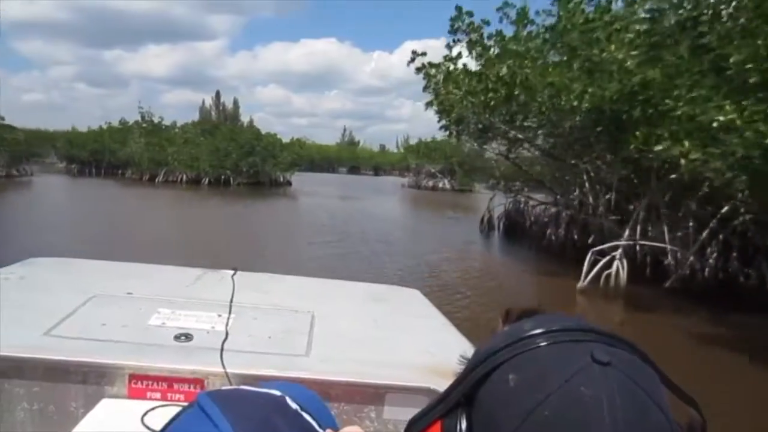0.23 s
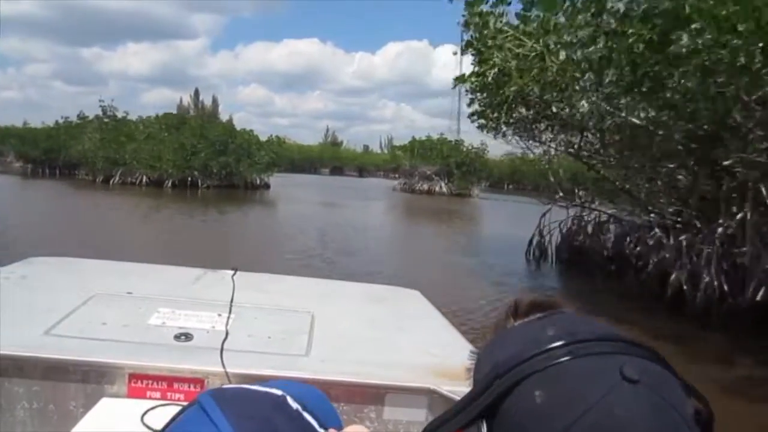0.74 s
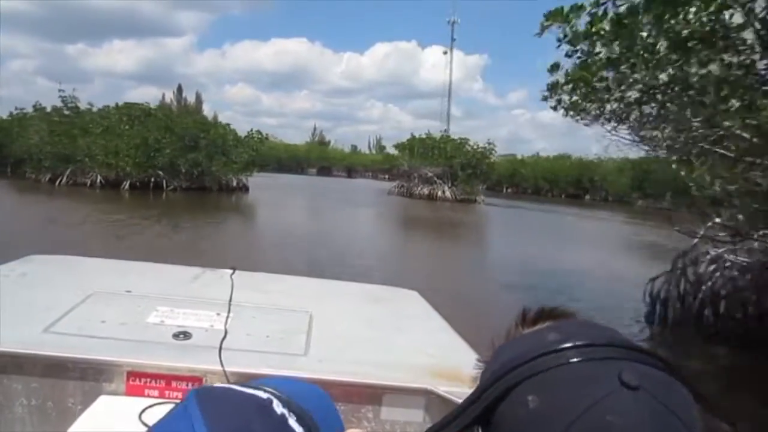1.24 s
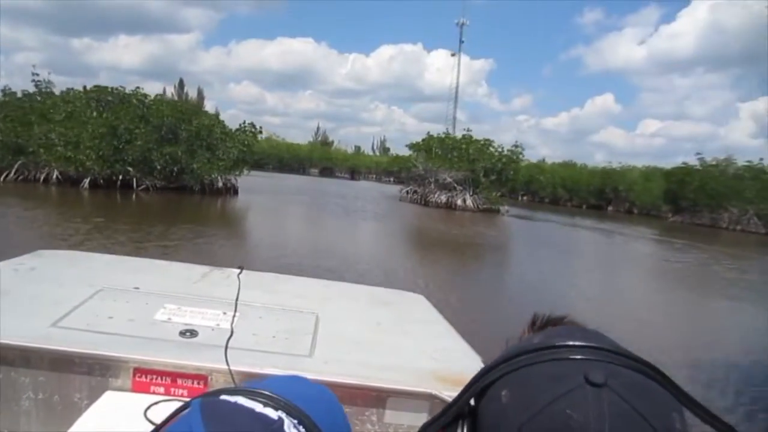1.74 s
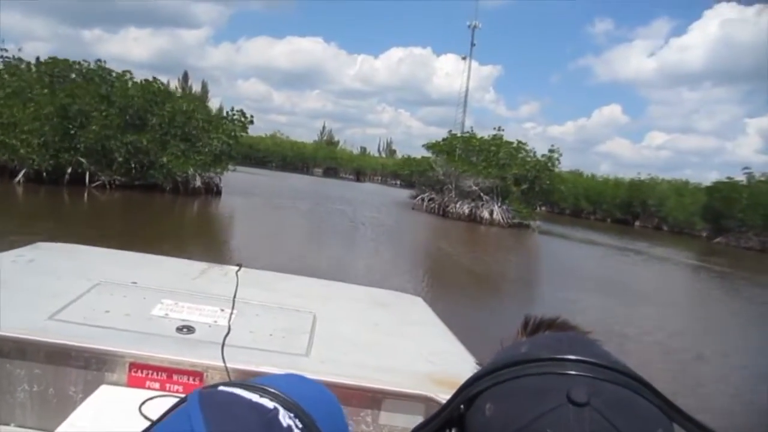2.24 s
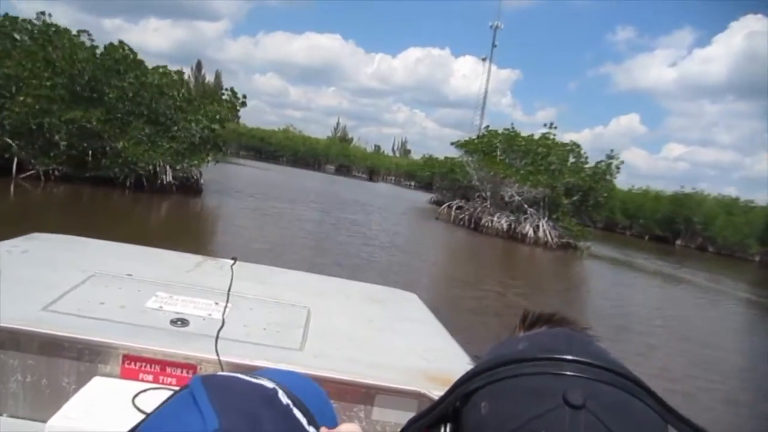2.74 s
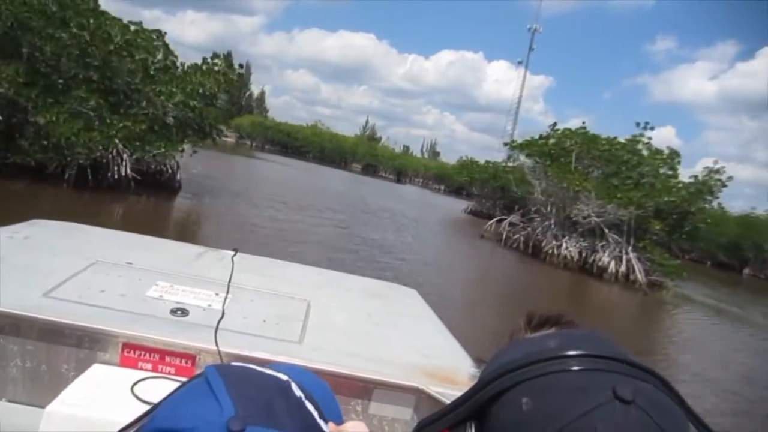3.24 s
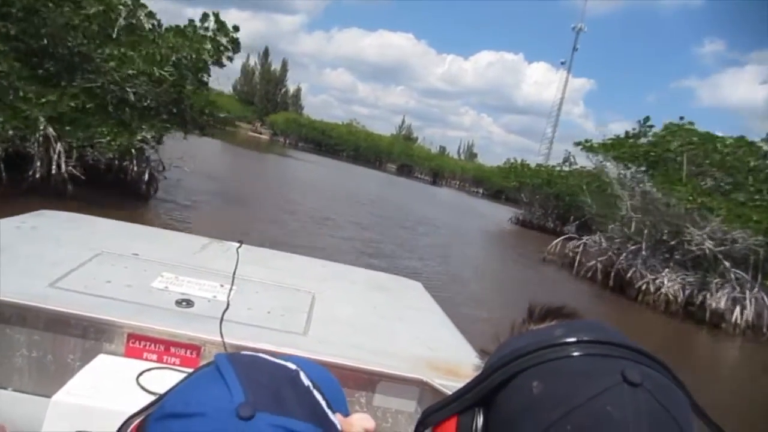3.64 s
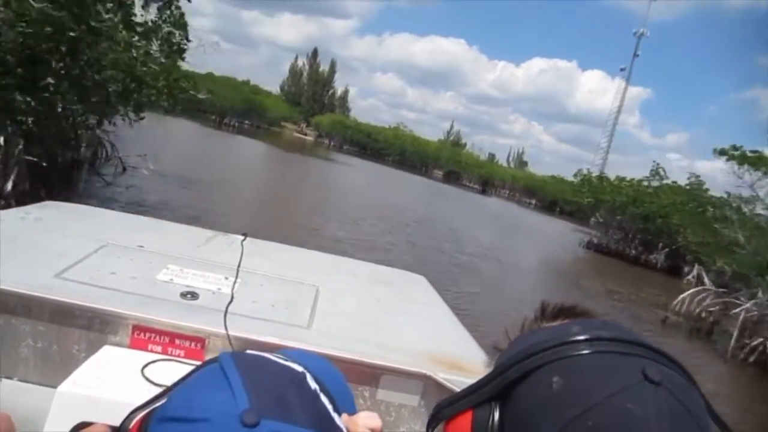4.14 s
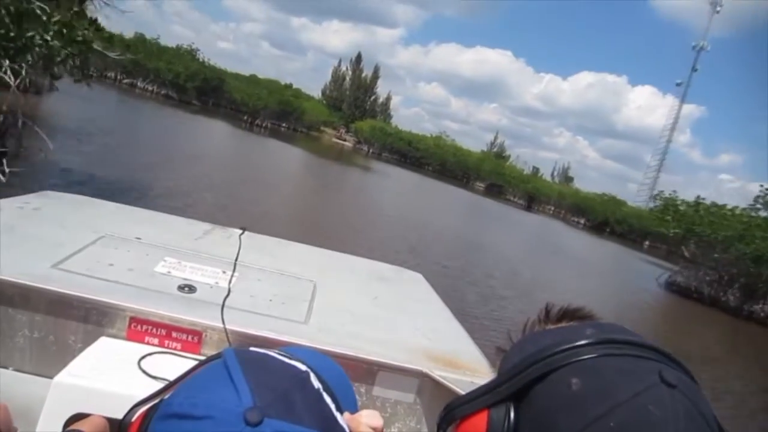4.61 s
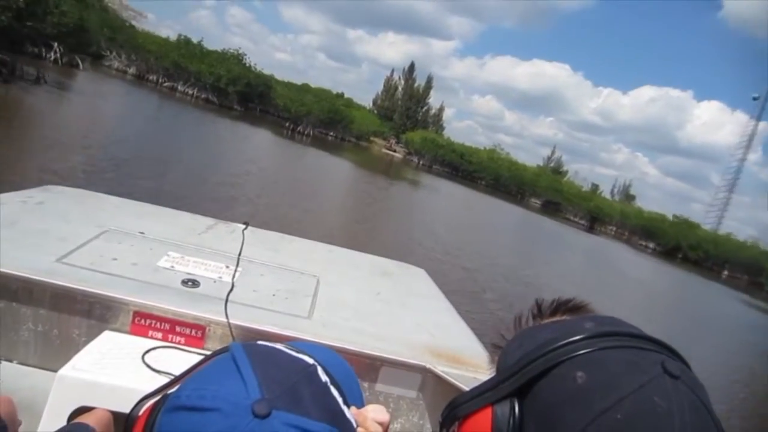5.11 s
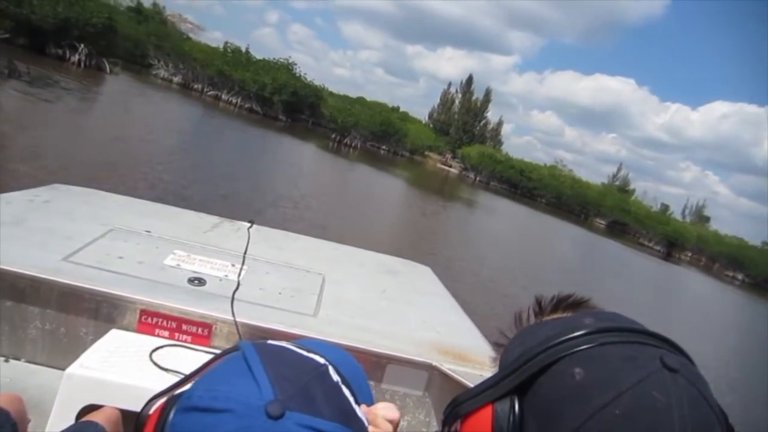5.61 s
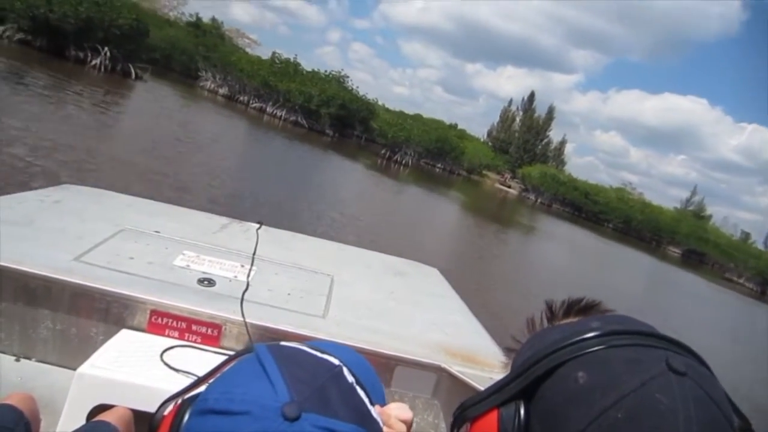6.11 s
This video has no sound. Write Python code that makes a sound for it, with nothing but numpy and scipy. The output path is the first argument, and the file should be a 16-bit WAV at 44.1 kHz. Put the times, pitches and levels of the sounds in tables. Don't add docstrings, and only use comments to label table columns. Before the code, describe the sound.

A loud airboat engine and propeller drone steadily, gradually rising in pitch and force, with roaring churned air and early low wind buffeting.

```python
import sys
import numpy as np
from scipy import signal
from scipy.fft import rfft, irfft, next_fast_len
from scipy.io import wavfile
from scipy.ndimage import uniform_filter1d

SR = 44100
rng = np.random.default_rng(int(sys.argv[2]) if len(sys.argv) > 2 else 0)


def level_to_linear(level):
    exponent = np.asarray(level, float) / 20
    return 10 ** exponent


def persist_wave(psi):
    counts = np.round(np.clip(psi, -1, 1) * 32767).astype(np.int16)
    wavfile.write(sys.argv[1], SR, np.atleast_2d(counts).T)


N = 280476
TIME = np.arange(N) / SR
COARSE = 8
GEAR = 2.617
CRUISE_HZ = 30

# time_s, cycle_hz
SPEED = [(0, 28.28), (.4, 28.32), (1.0, 28.4), (1.2, 28.68), (1.55, 29.18), (1.85, 29.32), (2.2, 29.7),
         (2.5, 29.28), (2.8, 29.04), (3.2, 29.19), (3.45, 29.2), (3.8, 29.8), (4.2, 30.47), (4.8, 31.42),
         (5.25, 31.84), (5.6, 32.24), (6.0, 32.57), (6.36, 32.9)]
# time_s, load_db
LOAD = [(0, -2.5), (.7, -3.5), (1.4, -1.6), (2.0, 0.1), (2.7, 1), (3.6, 1.5), (4.3, 0.3), (5.0, 1.5),
        (6.36, 2.5)]
# pitch_hz, half_width_hz, boost_db
HULL = [
    (203.5, 6.7, 4.5),
    (342.7, 15, -8.5),
    (484.2, 32, 9.5),
]


def exhaust():
    # level_db, gain_db_per_hz of speed, load_share
    pipe_tones = [(-26, 0.75, 0.3), (-26.5, 1.14, 0.22), (-33, 2.8, .4), (-17.5, 0.17, 1),
                  (-34.5, 0.9, 0.71), (-29, -0.24, 0.19), (-31, -.2, .1), (-37.5, -3.5, -.1),
                  (-38.5, 1.9, .1), (-22.5, -0.35, -0.13), (-34.5, -1.7, 0.59), (-34.5, -0.5, -0.53),
                  (-42.5, -2.7, -0.15), (-44, -1.7, -0.38), (-40, -0.1, .1), (-46, -1.5, -.3),
                  (-44, -1.2, 0.0076), (-43.5, -0.6, 0.024), (-44.5, -3.5, .1), (-52.5, -1, 0.19),
                  (-51.5, 2.3, .1), (-41, -3.1, .1), (-41.5, 1.3, 0.2), (-50, -2.2, -0.23), (-51.5, .1, .1),
                  (-44.5, -3, .1)]
    blade = blade_turning()
    chop = blade + 0.32 / blade
    return tones(pipe_tones, first=2, gear=1, chop=chop, hull=HULL, start=-0.2, sweep=-0.7,
                 sway_db=0.05, waver_db=0.08, wobble=0.008, spread=0.002, lag=0.001)


def propeller():
    # level_db, gain_db_per_hz of speed, load_share
    blade_tones = [(-25, 1.5, .2), (-33.5, 1, 0.2), (-26.5, -0.3, .1), (-23.5, -0.54, 0.99),
                   (-28.5, -0.9, -.5), (-39, .3, -0.036), (-35, 0.25, 0.41), (-34.5, 1, .1),
                   (-35.5, 1, 0.36), (-36, -1.5, -0.084), (-43, -0.6, -0.0032), (-49.5, 1.4, .1),
                   (-49.5, 0.3, .1), (-52, -0.7, .1)]
    # pitch_hz, half_width_hz, boost_db
    blade_dip = (86, 2.4, -10.5)
    return tones(blade_tones, first=1, gear=GEAR, chop=0, hull=HULL + [blade_dip], start=-2.7, sweep=-0.75,
                 sway_db=0.17, waver_db=0.3, wobble=0.032, spread=0.005, lag=0.008)


def roar():
    # (per Hz, against 1 kHz)
    roar_colour = [(20, -9), (40, 1.5), (70, 12), (150, 14.5), (300, 8.5), (500, 8), (750, 4), (1000, 1),
                   (1500, -9), (2200, -20.5), (3200, -34), (5000, -72.5)]
    # pitch_hz, likeness (0 to 1)
    roar_same = [(100, 0.96), (400, 1), (900, .93), (1500, .75), (2500, .3)]
    air = noise(roar_colour, roar_same, right_lead_s=0.000025, patchy_db=1.0, flicker_db=0.58)
    exhaust_beat = np.cos(2 * np.pi * 2 * engine_turns())
    pulse = fine(1 + 0.12 * blade_turning().real + 0.13 * exhaust_beat)
    level_db = -22.5 + 0.88 * (curves(SPEED)[0] - CRUISE_HZ) + 0.32 * curves(LOAD)[0]
    return level_to_linear(level_db) * pulse * air


def wind():
    # pitch_hz, level_db (per Hz)
    wind_colour = [(18, -35.5), (30, -5), (118, -0.5), (171, -3), (393, 1), (515, -2), (1520, -22.5),
                   (3050, -44.5), (3960, -77.5), (6710, -120)]
    # peak_s, half_length_s, level_db
    gust_times = [
        (0.197, .3, -26),
        (0.753, 0.29, -29),
        (1.375, 0.055, -24),
        (1.605, 0.17, -35.5),
        (1.885, .05, -27),
        (2.951, 0.18, -39),
        (6.15, .3, -39),
    ]
    lumps = fine(level_to_linear(0.97 * drift(15, count=2)))
    likeness = [(100, 0.09), (2000, -0.1)]
    rush = noise(wind_colour, likeness, right_lead_s=0, patchy_db=2.0, flicker_db=-0.5)
    strength = level_to_linear(-38.5)
    for peak_s, half_s, gust_db in gust_times:
        strength = strength + level_to_linear(gust_db) * np.exp(-((TIME - peak_s) / half_s) ** 2)
    sides_db = np.array([[-1.5], [4.0]])
    return strength * level_to_linear(sides_db) * lumps * rush


def hiss():
    # pitch_hz, level_db (per Hz)
    hiss_colour = [(800, -15.5), (2000, -1), (3200, 0.5), (4800, -0.5), (6000, -6.5), (7000, -12.5),
                   (7500, -19), (7900, -23), (8400, -15.5), (9200, -8), (10500, -4.5), (12200, -2),
                   (14000, -5), (15000, -5), (15900, -9.5)]
    # time_s, level_db
    spray_level = [(0, -61), (1.1, -60), (1.7, -59), (2.3, -60.2), (2.95, -62), (4.6, -59.5), (5.3, -60.5),
                   (6.36, -58)]
    likeness = [(3000, -0.22), (6000, -0.099), (12000, -0.05)]
    air = noise(hiss_colour, likeness, right_lead_s=0, patchy_db=0.4, flicker_db=-0.6)
    low = signal.sosfiltfilt(signal.butter(4, 7900, fs=SR, output="sos"), air)
    top_db = -2.3 + np.array([[-0.6], [0.6]])
    air = low + (air - low) * level_to_linear(top_db)
    lumps = fine(level_to_linear(2.3 * drift(420, count=1)))
    sides_db = np.array([[5.2], [7.3]])
    return level_to_linear(curves(spray_level)[0] + sides_db) * lumps * air


def tones(orders, first, gear, chop, hull, start, sweep, sway_db, waver_db, wobble, spread, lag):
    speed_hz = curves(SPEED)[0, ::COARSE]
    load_db = curves(LOAD)[0, ::COARSE]
    db, slope, share = np.transpose(orders)[:, :, None]
    k = first + np.arange(len(orders))[:, None]
    cycle_hz = gear * speed_hz

    level_db = db + slope * (speed_hz - CRUISE_HZ) + share * load_db
    boost_db = 0
    for hz, half_hz, top_db in hull:
        boost_db = boost_db + top_db * np.exp(-((k * cycle_hz - hz) / half_hz) ** 2)
    level_db = level_db + boost_db
    level_db = level_db + waver_db * k * drift(12, count=len(k))
    level_db = level_db + sway_db * k * drift(2, count=len(k))

    phase = 2 * np.pi * k * np.cumsum(cycle_hz) * COARSE / SR + start + sweep * k ** 2
    phase = phase + wobble * k * (drift(11, count=len(k)) + 2 * drift(0.4, count=len(k)))
    partials = np.sqrt(2) * level_to_linear(level_db) * np.exp(1j * phase)
    partials = partials * (1 + np.minimum(0.0032 * k ** 2, 0.27) * chop)

    apart = np.exp(1j * (spread * k * drift(1.3, count=len(k)) - lag * k - 0.012))
    left = (partials * apart).sum(0)
    right = (partials / apart).sum(0)
    return fine(np.array([left, right]).real)


def engine_turns():
    return np.cumsum(curves(SPEED)[0, ::COARSE]) * COARSE / SR


def blade_turning():
    return np.exp(2j * np.pi * GEAR * engine_turns())


def noise(colour, same, right_lead_s, patchy_db, flicker_db):
    frames = N // 256 + 5
    hz = np.fft.rfftfreq(1024, 1 / SR)
    a, b, c, d, patches = rng.standard_normal((frames, len(hz), 5)).T
    patches = uniform_filter1d(patches, size=8, axis=0)
    patches = evened(uniform_filter1d(patches, size=10, axis=1))
    flicker = evened(uniform_filter1d(rng.standard_normal(frames), size=4))
    same = np.clip(read(same, hz), -1, 1)[:, None]
    left = a + 1j * b
    lead = np.exp(2j * np.pi * hz * right_lead_s)[:, None]
    right = same * left * lead + np.sqrt(1 - same ** 2) * (c + 1j * d)
    level_db = read(colour, hz)[:, None] + patchy_db * patches + flicker_db * flicker
    spectrum = np.array([left, right]) * level_to_linear(level_db)
    return evened(signal.istft(spectrum, nperseg=1024, noverlap=768)[1][:, :N])


def drift(top_hz, count):
    size = next_fast_len(N // COARSE + 1)
    spectrum = rfft(rng.standard_normal((count, size)), axis=1)
    hz = np.fft.rfftfreq(size, COARSE / SR)
    slow = irfft(spectrum / (1 + (hz / top_hz) ** 2), size, axis=1)
    return evened(slow)[:, :len(TIME[::COARSE])]


def evened(x):
    return x / np.sqrt(np.mean(x ** 2) + 1e-20)


def read(points, hz):
    f, value = np.transpose(points)
    return np.interp(np.log(hz + 1), np.log(f + 1), value)


def curves(rows):
    s, *columns = np.transpose(rows)
    return np.array([np.interp(TIME, s, c) for c in columns])


def fine(x):
    full = signal.resample_poly(x, COARSE, 1, axis=-1, window=("kaiser", 10), padtype="line")
    return full[..., :N]


def scene():
    return exhaust() + propeller() + roar() + wind() + hiss()


def band_limit(x):
    return signal.sosfilt(signal.butter(12, 15750, fs=SR, output="sos"), x)


def record(dry):
    size = next_fast_len(N)
    envelope = abs(signal.hilbert(dry.mean(0), size)[:N])
    envelope_db = 20 * np.log10(envelope + 1e-6)
    over_db = np.logaddexp(0, (envelope_db + 8.5) / 1.5) * 1.5
    cut_db = 0.55 * uniform_filter1d(uniform_filter1d(over_db, size=50), size=50)
    held = dry / level_to_linear(cut_db - 0.73)
    held = signal.sosfiltfilt(signal.butter(2, 22, "high", fs=SR, output="sos"), held)
    return band_limit(held)


dry = scene()
out = record(dry)
persist_wave(out)
```